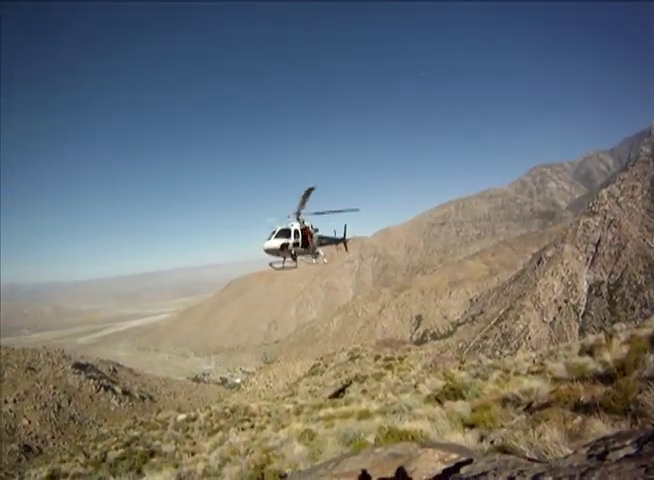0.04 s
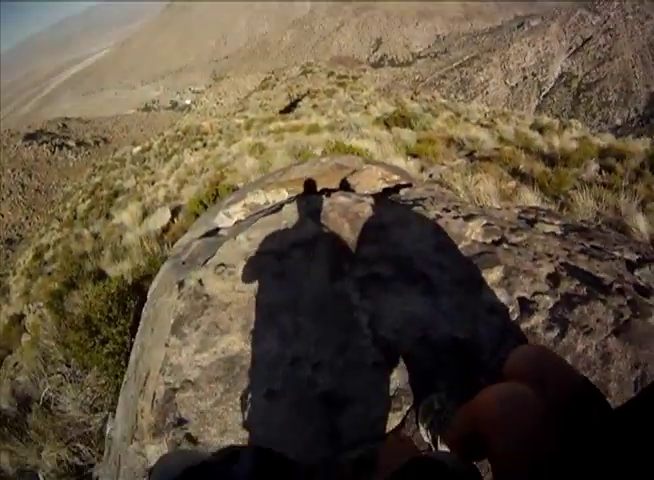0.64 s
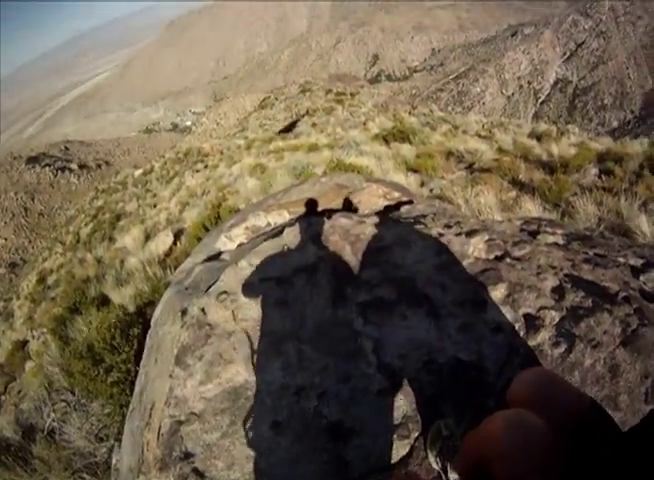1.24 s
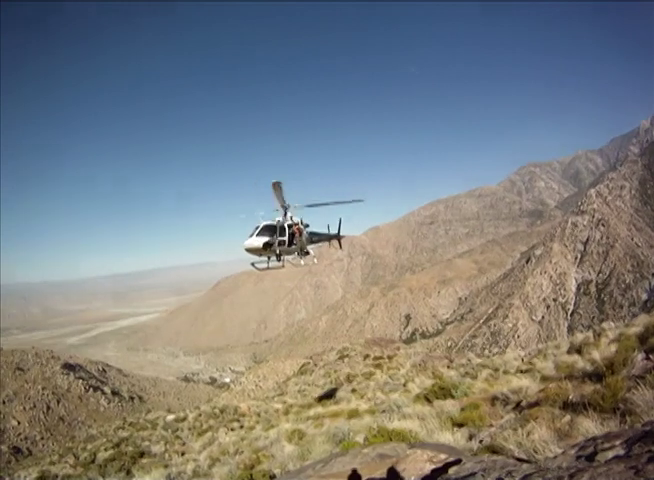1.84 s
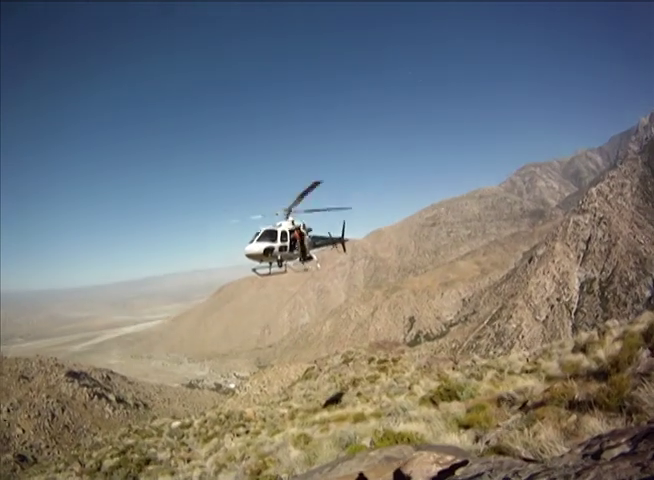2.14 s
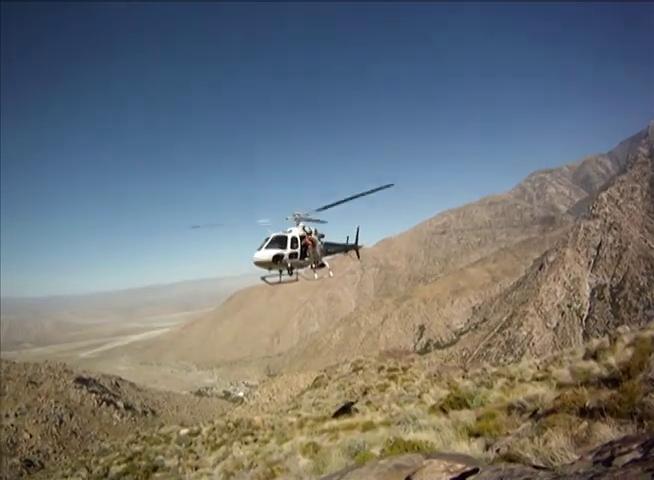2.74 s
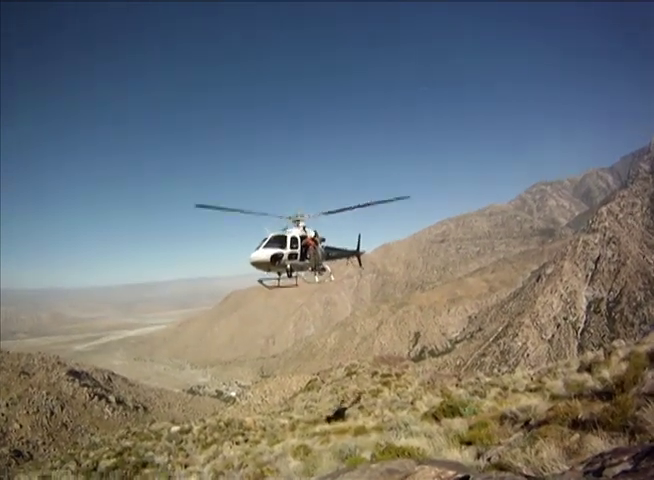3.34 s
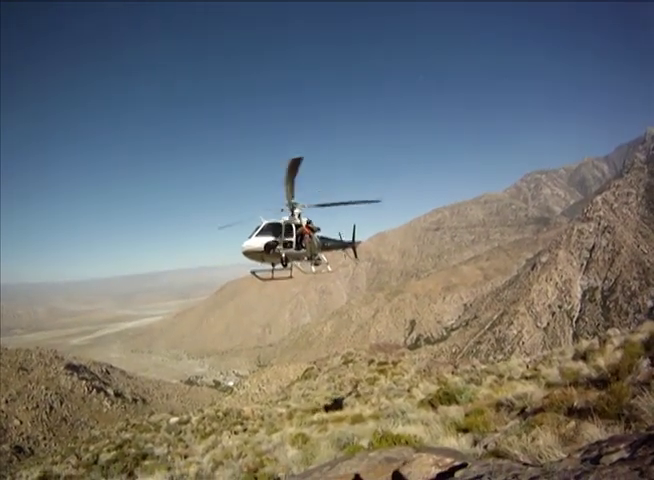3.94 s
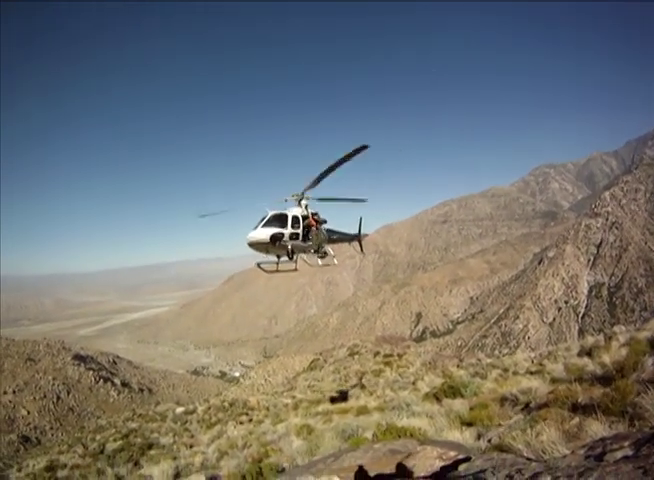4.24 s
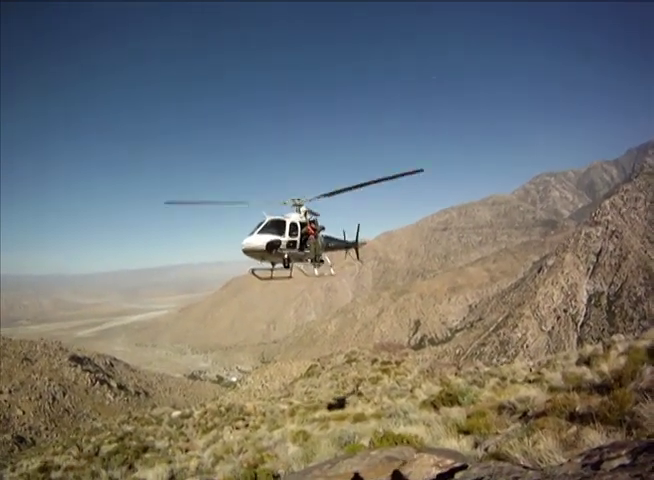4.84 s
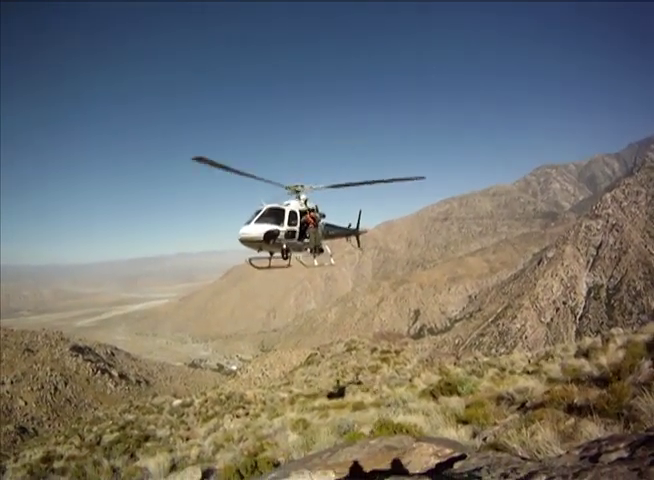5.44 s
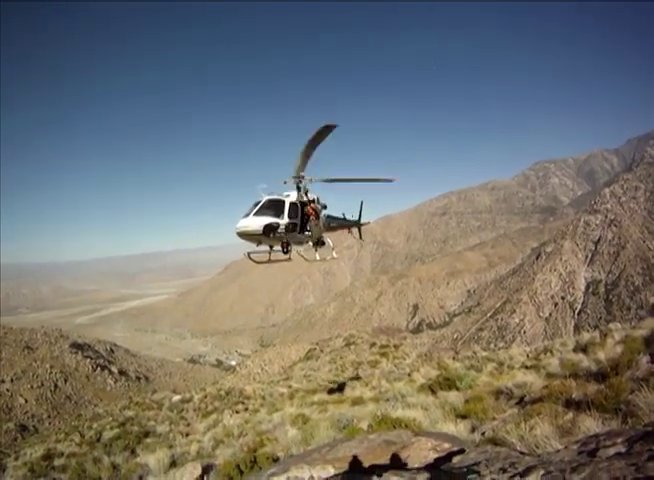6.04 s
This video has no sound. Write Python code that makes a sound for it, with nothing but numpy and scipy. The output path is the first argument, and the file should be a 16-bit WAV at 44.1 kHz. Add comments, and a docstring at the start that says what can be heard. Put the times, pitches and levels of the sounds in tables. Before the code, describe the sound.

Fast, loud rotor chop from a helicopter hovering nearby in rocky terrain runs from start to finish, over a buzzing tail rotor and churning turbine roar. Bursts of cracking blade slap come and go, lasting longer toward the end. Wind from the rotors buffets the small microphone with a low rumble and sudden puffs, the biggest making the sound duck for an instant.

```python
"""A light turbine helicopter hovers close to a rocky ridge, its main blades swishing and thumping.
Each blade pass radiates a pressure pulse and a burst of turbulent noise; in spells the blades strike
tip vortices and slap. The tail rotor rasps and the exhaust roars behind them, coloured by rock echoes.
Downwash buffets the microphone of a small camera, whose limiter ducks after the big puffs
and whose coarse sampling adds a fizzy top."""
import sys
import numpy as np
from scipy import signal
from scipy.fft import rfft, irfft, next_fast_len
from scipy.io import wavfile
from scipy.ndimage import uniform_filter1d

SR = 44100
rng = np.random.default_rng(int(sys.argv[2]) if len(sys.argv) > 2 else 0)


def store_wav(level_fs):
    """Save 16-bit WAV to argv[1]."""
    pcm = np.round(np.clip(np.atleast_2d(level_fs), -1, 1) * 32767)
    wavfile.write(sys.argv[1], SR, pcm.T.astype(np.int16))


N = 268128
T = np.arange(N) / SR

# Swish of the main blades: (time [s], relative level [dB])
SWISH_LEVEL = [(0, -18), (.4, -21.5), (.72, -29.5), (1.06, -21.5), (2.05, -18), (2.45, -28.5), (3.55, -19),
               (3.8, -26), (4.7, -18.5), (5.85, -20.5), (6.08, -29)]
# Its spectrum, with rock-echo humps near 550, 1150 and 2100 Hz: (frequency [Hz], relative level [dB])
SWISH_SPECTRUM = [(120, -10), (300, -32), (420, 4.5), (560, 9.5), (680, -16), (830, -6.5), (1150, 0),
                  (1600, -7.5), (2150, -3), (2900, -6.5), (3650, -13.5), (4200, -24), (4900, -18.5),
                  (5900, -26)]
MAIN_PHASE = .255  # share of one blade pass at time zero


def main_rotor(pass_hz, swish_db=4.5, width_s=0.0022, uneven_db=1.5, jitter_s=0.0015,
               echo_db=-10, echo_delay_s=0.0076, echo_width_s=0.0076,
               thump_db=-21, thump_lead_s=0.0028, thump_width_s=0.0021):
    """Rotor noise: each blade displaces air in a thump and sheds a swish, which the slope scatters."""
    blade, t = blade_passes(pass_hz, MAIN_PHASE)
    strength, lateness = rng.standard_normal((blade[-1] + 1, 2))[blade].T
    direct = bell(t - jitter_s * lateness, width_s) * noise(SWISH_SPECTRUM)
    scattered = gain_of(echo_db) * bell(t - echo_delay_s, echo_width_s) * noise(SWISH_SPECTRUM)
    swish = gain_of(swish_db) * envelope(SWISH_LEVEL) * (direct + scattered)
    thump = gain_of(thump_db) * push_pull(t + thump_lead_s, thump_width_s)
    return gain_of(uneven_db * strength) * (swish + thump)


# Spells of vortex strikes: (time [s], relative peak level [dB], build-up [s], fade [s])
VORTEX_SPELLS = [(0.088, -27, .04, 0.022), (.255, -17.5, 0.023, 0.042), (1.18, -20.5, 0.021, 0.035),
                 (1.32, -13.5, 0.066, .025), (1.39, -16.5, 0.043, 0.057), (1.78, -22, 0.04, 0.026),
                 (2.028, -18, 0.031, .02), (2.315, -15, 0.025, .05), (2.95, -24.5, 0.018, 0.018),
                 (3.415, -23, .02, 0.025), (4.49, -20, .02, 0.047), (4.87, -16, 0.046, 0.16),
                 (5.1, -14, 0.066, 0.014), (5.31, -19, .02, 0.023), (5.41, -18, 0.021, .02),
                 (5.57, -16.5, .02, 0.23), (5.92, -18.5, .02, .02)]
# Spectrum of a slap: (frequency [Hz], relative level [dB])
SLAP_SPECTRUM = [(120, -35), (300, -8), (560, 6.5), (830, -4.5), (1150, 0.5), (1600, -1.5), (2150, 3.5),
                 (2900, -9), (3650, -12.5), (4200, -21.5), (4900, -21), (5900, -29.5)]


def blade_slaps(pass_hz, slap_db=4.5, half_length_s=0.0041,
                echo_db=-17, echo_delay_s=0.0047, echo_width_s=0.0053):
    """Blade-vortex interaction: a blade cracks through the last one's tip vortex; the ground echoes it."""
    blade, t = blade_passes(pass_hz, MAIN_PHASE)
    pass_times = np.interp(np.arange(blade[-1] + 1), blade + t * pass_hz, T)
    spells = [gain_of(db) * bell(pass_times - peak_s, np.where(pass_times < peak_s, build, fade))
              for peak_s, db, build, fade in VORTEX_SPELLS]
    strength = np.max(spells, axis=0)
    tear = noise(SLAP_SPECTRUM)
    gate = np.exp(-(t / half_length_s) ** 4)
    # equalise the cracks so that the spells alone set their energy
    power = np.bincount(blade, (gate * tear) ** 2) / (np.bincount(blade, gate ** 2) + 1e-12)
    crack = gate * tear / np.sqrt(power[blade] + 1e-12)
    echo = gain_of(echo_db) * bell(t - echo_delay_s, echo_width_s) * tear
    return gain_of(slap_db) * strength[blade] * (crack + echo)


# Loading of the tail rotor: (time [s], relative level [dB])
TAIL_LOADING = [(0, -29), (.5, -18.5), (.8, -41), (1.5, -30), (1.87, -27.5), (2.02, -18), (2.55, -24),
                (2.78, -19), (3.2, -24.5), (3.37, -16.5), (3.7, -28), (4, -22.5), (4.25, -23.5),
                (4.7, -19.5), (5.85, -23.5), (6.08, -18)]
# Spectrum of its rasp: (frequency [Hz], relative level [dB])
RASP_SPECTRUM = [(150, -24), (300, 8), (420, -2.5), (560, -2), (680, 0), (830, -5.5), (1150, -5.5),
                 (1600, -5.5), (2150, -4.5), (2900, -9), (3650, -22.5), (4200, -30.5), (4900, -36),
                 (5900, -55)]


def tail_rotor(pass_hz, rasp_db=4, width_s=0.0013, uneven_db=4.0, jitter_s=0.00034,
               gust_db=2.5, gust_hz=14, echo_db=-9, echo_delay_s=0.0024,
               pulse_db=-1, pulse_width_s=0.00057):
    """Unsteady loading: small fast blades in gusty air give a pulse and a spit of noise at each pass."""
    blade, t = blade_passes(pass_hz, start_phase=.16)
    strength, lateness = rng.uniform(-0.89, 1, (blade[-1] + 1, 2))[blade].T
    gate = bell(t - jitter_s * lateness, width_s) + gain_of(echo_db) * bell(t - echo_delay_s, width_s)
    spit = gain_of(rasp_db) * gate * noise(RASP_SPECTRUM)
    pulse = gain_of(pulse_db) * push_pull(t, pulse_width_s)
    loading = envelope(TAIL_LOADING) * gain_of(uneven_db * strength + gust_db * drift(gust_hz))
    return loading * (spit + pulse)


# Roar of exhaust and churned air: (time [s], relative level [dB])
ROAR_LEVEL = [(0, -26.5), (.45, -20), (.66, -26), (1.3, -24), (1.52, -25), (2.08, -24), (2.33, -20.5),
              (3.5, -22), (4.4, -19), (4.83, -25), (5.33, -19.5), (5.69, -24.5), (6.08, -21)]
# Its spectrum: (frequency [Hz], relative level [dB])
ROAR_SPECTRUM = [(40, -10.5), (180, -5), (300, -5.5), (420, -2.5), (570, 1.5), (680, -5), (830, -12),
                 (1200, -12.5), (1600, -15), (2150, -16), (2900, -21), (3650, -26.5), (4150, -35),
                 (4900, -30.5), (5900, -40)]


def turbine(roar_db=1.0, churn_db=2.5, churn_hz=120, gear_hz=652, gear_db=-40, waver=0.00166):
    """Turbulent mixing: the exhaust gives a churning broadband roar over a faint gearbox tone."""
    roar = gain_of(roar_db + churn_db * drift(churn_hz)) * envelope(ROAR_LEVEL) * noise(ROAR_SPECTRUM)
    pitch_hz = gear_hz * (1 + waver * drift(rate_hz=3.6))
    gear = np.sin(2 * np.pi * np.cumsum(pitch_hz) / SR)
    return roar + gain_of(gear_db) * gear


# Downwash on the microphone: (time [s], relative level [dB])
WIND_LEVEL = [(0, -19), (.6, -13.5), (.92, -15), (1.26, -22.5), (1.4, -17.5), (1.8, -16.5), (1.96, -24),
              (2.25, -17), (2.75, -16), (3.4, -18.5), (3.7, -17), (4.75, -15.5), (5.25, -21), (6.08, -18.5)]
# Its spectrum: (frequency [Hz], relative level [dB])
WIND_SPECTRUM = [(6, -29), (18, 9.5), (35, -2.5), (62, 2.5), (130, -1.5), (190, -7.5), (300, -15.5),
                 (700, -28.5), (2000, -72)]
# Single puffs arriving at the diaphragm: (time [s], peak level [dB], Gaussian width [s])
PUFFS = [(0.3, 3.5, 0.0021), (.575, -2, 0.0025), (0.65, -6, 0.0015), (0.946, -2, 0.0012),
         (1.471, 7, 0.0017), (1.805, -2.5, 0.00098), (1.877, 7, 0.00094), (2.042, 10.5, 0.0017),
         (2.544, 6, 0.0019), (3.167, 0, 0.00093), (3.439, 1, 0.0015), (4.12, 8, 0.0011),
         (4.541, -3, 0.0015), (5.153, -1.5, 0.0026), (6.057, 15, 0.00093)]


def downwash(wind_db=1.5, lumps_db=1.5, lump_hz=25, swell_db=0.5, swell_lead_s=0.012, swell_width_s=0.035):
    """Pseudo-sound: eddies push and pull the diaphragm in a rumble that swells just before each puff."""
    swells, puffs = np.zeros(N), np.zeros(N)
    for peak_s, db, width_s in PUFFS:
        near = abs(T - peak_s) < .15
        t = T[near] - peak_s
        swells[near] += bell(t + swell_lead_s, swell_width_s)
        puffs[near] += rng.choice([-1, 1]) * gain_of(db) * bell(t, width_s)
    rumble = unit_rms(noise(WIND_SPECTRUM) * gain_of(lumps_db * drift(lump_hz)))
    return gain_of(wind_db + swell_db * swells) * envelope(WIND_LEVEL) * rumble + puffs


# The camera tips down and its body shades the microphone: (time [s], share of treble lost [0-1])
TREBLE_LOSS = [(.4, 0), (.72, 0.46), (1.05, 0.23), (1.35, 0)]


def body_shadow(x, corner_hz=1200):
    """Diffraction: long waves bend round the camera body, while short ones are blocked."""
    treble = signal.lfilter(*signal.butter(1, corner_hz, "high", fs=SR), x)
    loss = np.interp(T, *np.transpose(TREBLE_LOSS))
    return x - loss * treble


def blade_passes(pass_hz, start_phase):
    """Phase integrates frequency: gives the nearest pass's number and the signed time since it [s]."""
    phase = start_phase + np.cumsum(pass_hz) / SR
    blade = np.round(phase).astype(int)
    return blade, (phase - blade) / pass_hz


def bell(t, width):
    """Gaussian pulse of height 1 at t = 0."""
    return np.exp(-.5 * (t / width) ** 2)


def push_pull(t, width):
    """Bipolar pulse of a passing blade: compression, then rarefaction, each of height 1."""
    return -t / width * bell(t, width) * np.exp(.5)


def gain_of(db):
    """Decibel law: 20 dB is a factor of ten in amplitude."""
    return 10 ** (np.asarray(db) / 20)


def unit_rms(x):
    """Normalisation to rms 1."""
    return x / np.sqrt(np.mean(x ** 2) + 1e-20)


def envelope(curve):
    """Interpolation in decibels gives a level curve's amplitude at every sample."""
    return gain_of(np.interp(T, *np.transpose(curve)))


def noise(spectrum):
    """Spectral shaping: white noise filtered to the given spectrum, at rms 1."""
    hz, db = np.transpose(spectrum)
    size = next_fast_len(N)
    bin_hz = np.fft.rfftfreq(size, 1 / SR)
    shape = gain_of(np.interp(np.log(bin_hz + 1), np.log(hz), db))
    return unit_rms(irfft(rfft(rng.standard_normal(size)) * shape, size)[:N])


def drift(rate_hz):
    """Random modulation: noise of rms 1, low-passed at about rate_hz."""
    hz = np.fft.rfftfreq(N, 1 / SR)
    return unit_rms(irfft(rfft(rng.standard_normal(N)) * np.exp(-(hz / rate_hz) ** 2), N))


# Blade-passing frequencies: (time [s], main rotor [Hz], tail rotor [Hz])
PASS_RATES = [(0, 19.47, 69.2), (.5, 19.48, 69.0), (1, 19.58, 68.94), (1.7, 19.58, 69.11),
              (3, 19.57, 69.23), (3.95, 19.56, 69.04), (4.6, 19.51, 69.09), (6.1, 19.5, 69.1)]


def scene():
    """Superposition: both rotors, the turbine and the downwash add at one microphone."""
    times, main, tail = np.transpose(PASS_RATES)
    main_hz, tail_hz = np.interp(T, times, main), np.interp(T, times, tail)
    rotors = main_rotor(main_hz) + blade_slaps(main_hz) + tail_rotor(tail_hz)
    return (body_shadow(rotors + turbine()) + downwash())[None]


def limiter(x, threshold_db=-5, attack_s=0.0019, recovery_s=0.09):
    """Gain compression: the gain falls within milliseconds of an overload and creeps back."""
    power_db = 10 * np.log10(abs(uniform_filter1d(x ** 2, size=130)) + 1e-12)
    over_db = np.maximum(power_db - threshold_db, 1e-6)
    # peak hold with exponential release
    held_db = np.exp(np.maximum.accumulate(np.log(over_db) + T / recovery_s) - T / recovery_s)
    pole = np.exp(-1 / (attack_s * SR))
    reduction_db = signal.lfilter([1 - pole], [1, -pole], held_db)
    return x / gain_of(reduction_db)


def record(dry, low_cut_hz=42, sampling_hz=12000, band_limit_hz=15400):
    """Spectral imaging: holding coarse samples mirrors the limited, clipped sound into the treble."""
    # the low cut makes each puff swing back past zero
    coupled = signal.lfilter(*signal.butter(1, low_cut_hz, "high", fs=SR), limiter(dry[0]))
    coarse = np.clip(signal.resample_poly(coupled, sampling_hz, SR), -1, 1)
    held = signal.resample_poly(np.repeat(coarse, 4), SR, 4 * sampling_hz)[:N]
    low_pass = signal.firwin(301, band_limit_hz, window=("kaiser", 8), fs=SR)
    return signal.oaconvolve(held, low_pass, "same")[None]


dry = scene()
out = record(dry)
store_wav(out)
```